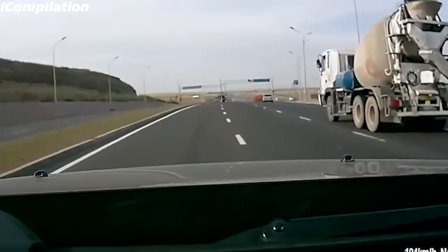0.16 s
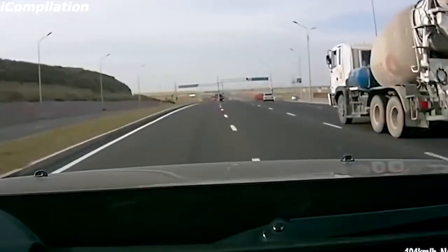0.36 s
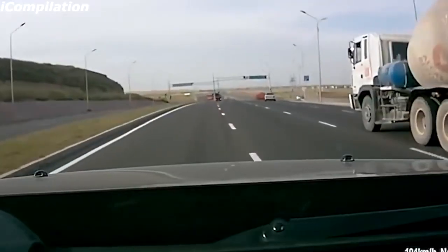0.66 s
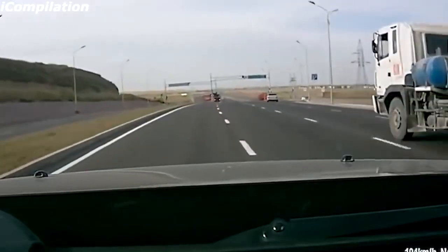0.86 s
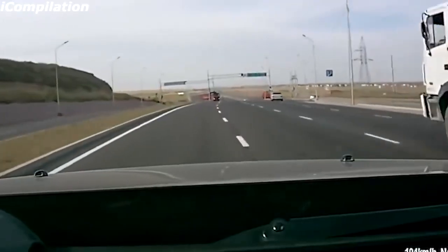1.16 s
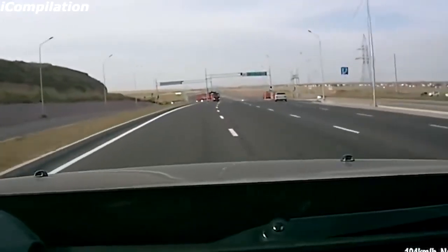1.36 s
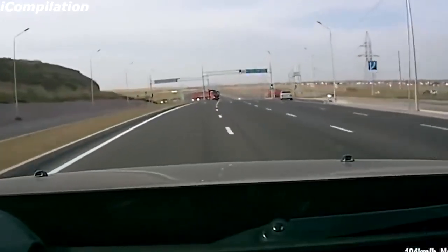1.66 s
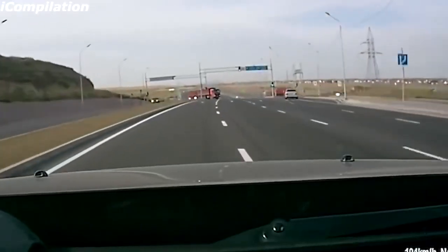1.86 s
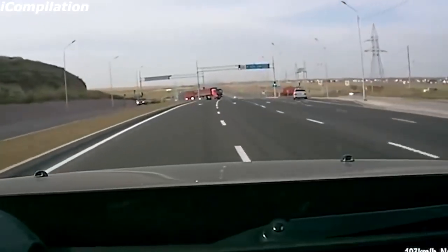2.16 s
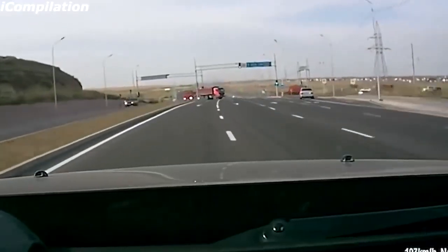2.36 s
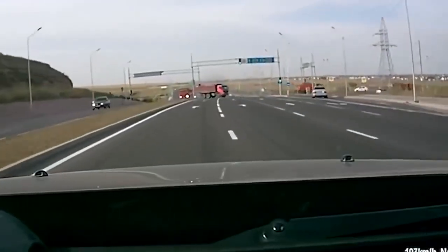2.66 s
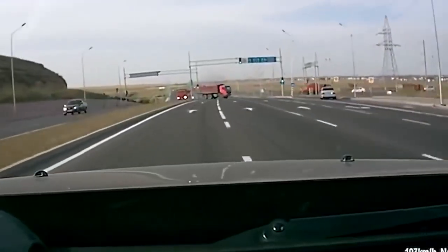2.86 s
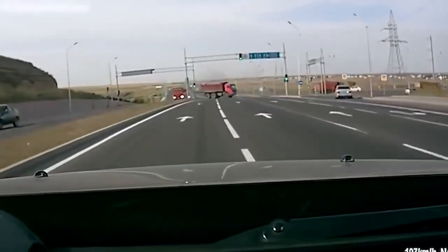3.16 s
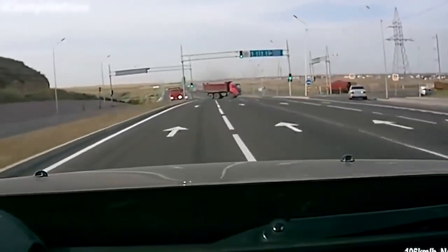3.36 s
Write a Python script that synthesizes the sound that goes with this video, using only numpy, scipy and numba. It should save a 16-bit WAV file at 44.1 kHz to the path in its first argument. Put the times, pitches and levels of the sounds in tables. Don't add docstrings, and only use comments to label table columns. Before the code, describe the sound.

Heavy low road rumble and fluttering air pressure inside a fast car, overloading a cheap microphone

```python
import sys
import numpy as np
from scipy import signal
from scipy.io import wavfile
from scipy.ndimage import uniform_filter1d
from numba import njit

SR = 44100
rng = np.random.default_rng(int(sys.argv[2]) if len(sys.argv) > 2 else 0)


def volts(x):
    e = np.asarray(x, float) / 20
    return 10 ** e


def wrap_up_sound(samples):
    columns = np.atleast_2d(samples).T
    tamed = np.clip(columns, -1, 1)
    steps = np.round(tamed * 32767).astype(np.int16)
    wavfile.write(sys.argv[1], SR, steps)


N = 154350
T = np.arange(N) / SR

# (time [s], rate [Hz], level [dB])
THROB = [(0.0, 12.66, -33), (0.201, 14.76, -31), (0.42, 17.19, -24.5), (0.6, 15.64, -25),
         (0.72, 15.88, -29), (0.849, 15.08, -22), (1.05, 13.74, -22), (1.301, 15.9, -23),
         (1.497, 17.02, -22), (1.598, 11.64, -30), (1.718, 14.52, -22.5), (1.95, 13.83, -26),
         (2.148, 15.37, -27), (2.454, 14.91, -25.5), (2.8, 16.63, -19), (3.1, 14.38, -17),
         (3.349, 16.77, -24.5), (3.5, 14.8, -66)]
# (time [s], length [s], direction [+1 or -1])
SURGES = [(.840, .0035, 1), (.940, .0078, -1), (1.049, .004, 1), (1.083, .005, -1), (1.343, .0065, -1),
          (1.3725, .004, 1), (1.418, .002, -1), (1.692, .0055, -1), (1.719, .0075, 1), (1.822, .0045, -1),
          (2.9365, .0095, -1), (3.067, .0078, -1)]
# (time [s], peak level [dB])
SPITS = [(0.272, -62), (0.8323, -39), (0.9696, -44), (0.998, -55), (1.0187, -49), (1.04, -50),
         (1.0746, -44), (1.304, -49), (1.36, -34), (1.402, -47), (1.4637, -48), (1.512, -46), (1.6842, -44),
         (1.711, -49), (1.743, -49), (1.778, -60), (1.8095, -44.5), (1.836, -39), (2.6166, -49),
         (2.678, -51), (2.749, -43), (2.9276, -40), (2.9583, -38), (3.0012, -50), (3.193, -48), (3.26, -42)]


def rms_one(x):
    return x / np.sqrt(np.mean(x ** 2) + 1e-20)


def drift(rate):
    hop = 40
    r = np.exp(-2 * np.pi * rate * hop / SR)
    white = rng.standard_normal(N // hop + 2002)
    slow = signal.lfilter([1], [1, -2 * r, r * r], white)[2000:]
    return np.interp(np.arange(N) / hop, np.arange(len(slow)), rms_one(slow))


def bandpass(x, low, high, order=2):
    return signal.sosfilt(signal.butter(order, [low, high], "band", fs=SR, output="sos"), x)


def banded_noise(spectrum, patchy_db, rate):
    hz, db = np.transpose(spectrum)
    together = drift(rate)
    edges = 14 * 2 ** np.arange(0, 10.6, .5)
    edges = edges[(edges > hz[0] / 1.5) & (edges < hz[-1] * 1.5)]
    white = rng.standard_normal((2, N + SR // 2))
    out = 0
    for k, (low, high) in enumerate(zip(edges, edges[1:])):
        band = bandpass(white[k % 2], low, high)[-N:]
        band_db = np.interp(np.log(low * high) / 2, np.log(hz), db)
        flicker_db = patchy_db * (1.1 * together + drift(rate))
        out = out + band * volts(band_db + flicker_db)
    return rms_one(out)


def resonances(modes, patchy_db, rate):
    out = 0
    for hz, width, db in modes:
        r = np.exp(-np.pi * width / SR)
        sos = [[1, 0.0011, -1, 1, -2 * r * np.cos(2 * np.pi * hz / SR), r * r]] * 2
        ring = rms_one(signal.sosfilt(sos, rng.standard_normal(N + SR))[-N:])
        out = out + volts(db + patchy_db * drift(rate)) * ring
    return out


def swing_phase():
    s, hz, _ = np.transpose(THROB)
    return 2 * np.pi * np.cumsum(np.interp(T, s, hz)) / SR


def throb():
    wobble_db, overtone_db, squaring_db = .6, -16, -16.5
    s, _, db = np.transpose(THROB)
    phase = swing_phase()
    swing = np.cos(phase) + volts(overtone_db) * np.sin(3 * phase) - volts(squaring_db) * np.cos(3 * phase)
    return np.sqrt(2) * volts(np.interp(T, s, db) + wobble_db * drift(4.62)) * swing


def road(shake_db):
    # (frequency [Hz], density [dB per Hz])
    rumble_curve = [(15, -44.5), (25, -7.5), (151, -19), (286, -28.5), (345, -27), (489, -28.5), (800, -42),
                    (1040, -52), (1760, -120)]
    # (frequency [Hz], width [Hz], level [dB])
    boom_modes = [(33.33, 5.7, -41), (46.34, 20, -35), (76.85, 13.3, -40), (191.9, 46, -49.5),
                  (259.6, 96, -46.5), (498, 107, -56)]
    rumble_db, deep_hz, deep_share = -36, 86.2, .45
    rumble = volts(rumble_db) * banded_noise(rumble_curve, patchy_db=0.0, rate=3.76)
    body = rumble + resonances(boom_modes, patchy_db=0.0, rate=3.26)
    deep = signal.sosfiltfilt(signal.butter(2, deep_hz, fs=SR, output="sos"), body)
    return deep * volts(deep_share * shake_db) + (body - deep) * volts(shake_db)


def tyres(flutter_db):
    # (frequency [Hz], density [dB per Hz])
    roar_curve = [(880, -71), (1500, 7), (1600, 11.5), (2790, -3), (4000, 12), (5200, -28.5), (8800, -120)]
    # (frequency [Hz], width [Hz], level [dB])
    ring_modes = [(954, 277, -50.5), (1111.7, 103, -54), (1259, 158, -57), (2816, 260, -75.5)]
    roar_db, gust_db, cut_hz, puff_share = -56, 4, 3134, 0.76
    roar = volts(roar_db + gust_db * gust()) * banded_noise(roar_curve, patchy_db=0.88, rate=7.3)
    rings = resonances(ring_modes, patchy_db=1.34, rate=17)
    dulled = signal.sosfilt(signal.butter(8, cut_hz, fs=SR, output="sos"), roar + rings)
    return dulled * volts(puff_share * flutter_db)


def wind(flutter_db):
    # (frequency [Hz], density [dB per Hz])
    hiss_curve = [(2350, -42), (4000, 3), (5430, -18.5), (6650, -3.5), (9440, 0.5), (11800, -5),
                  (14000, -11.5)]
    # (frequency [Hz], width [Hz], level [dB])
    whistle_modes = [(5430, 2240, -73.5), (8200, 870, -89)]
    hiss_db, gust_db = -69.5, 6
    hiss = volts(hiss_db + gust_db * gust()) * banded_noise(hiss_curve, patchy_db=-1.5, rate=4.0)
    whistles = volts(gust_db * gust()) * resonances(whistle_modes, patchy_db=1.0, rate=32)
    return (hiss + whistles) * volts(flutter_db)


def seal_flutter():
    # (time [s], width [s], air level [dB], body level [dB])
    puff_events = [(0.242, 0.055, -5.5, -5.5), (0.363, 0.022, 7.5, 4), (.48, 0.029, -7, -5.5),
                   (.56, 0.095, 2.5, 2), (0.691, 0.02, 9.5, 5.5), (.76, 0.053, 4.5, 2.5),
                   (.826, 0.0088, 2.5, 4.5), (1.077, 0.0058, 2.5, 5.5), (1.17, 0.17, 3, 2),
                   (1.41, 0.0054, 10, 11), (1.471, 0.011, 7, 5.5), (1.525, 0.028, 7, 7),
                   (1.594, 0.035, 11.5, 12), (1.633, 0.024, 5, 7), (1.813, 0.0054, 4.5, 9),
                   (1.918, 0.0061, 9.5, 3.5), (2.06, 0.011, 7, 7), (2.11, 0.06, 9.5, 6.5),
                   (2.291, 0.026, 4.5, 5), (2.468, 0.034, 5.5, 4), (2.62, 0.018, 4.5, 1),
                   (2.748, 0.0085, 1.5, -0.5), (2.828, 0.04, 8.5, 6), (2.91, 0.013, -3, 1),
                   (3.1, 0.17, 2.5, 1), (3.25, 0.032, 3.5, 3.5), (3.333, 0.011, 6, 0.5),
                   (3.45, 0.045, 5.5, 5)]
    breath_db, breath_lead = 2, .6
    spit_over_db, spit_share, spit_s = 52.5, 0.84, 0.0025
    air, body = 0, 0
    for s, width, air_db, body_db in puff_events:
        puff = np.exp(-((T - s) / width) ** 2)
        air = air + air_db * puff
        body = body + body_db * puff
    for s, db in SPITS:
        air = air + spit_share * (db + spit_over_db) * np.exp(-((T - s - spit_s) / spit_s) ** 2)
    breath = breath_db * np.cos(2 * swing_phase() + breath_lead) + 0.4 * drift(19)
    return air + breath, body + 0.94 * breath


def thumps():
    # (time [s], length [s], pitch [Hz], level [dB])
    joint_hits = [
        (.345, 0.024, 36.8, -23),
        (.645, 0.015, 45.6, -22.5),
        (1.55, 0.0344, 50.5, -20.5),
        (3.38, 0.016, 49, -21.5),
    ]
    out = 0
    for s, length, hz, db in joint_hits:
        out = out + volts(db) * np.exp(-((T - s) / length) ** 2) * np.sin(2 * np.pi * hz * (T - s))
    return out


def surges():
    out = 0
    for s, length, way in SURGES:
        out = out + way * volts(-8) * np.exp(-(2 * (T - s) / length) ** 4)
    return out


def gust():
    peak_s, rise_s, fall_s = 2.5, 0.8, 0.24
    return np.exp(-((T - peak_s) / np.where(T < peak_s, rise_s, fall_s)) ** 2)


@njit
def gain_control(x, trim, limit, top, most, down, up, hold):
    out, gain, wait = np.empty_like(x), most, 0.
    for i in range(len(x)):
        out[i] = min(max(x[i] * gain * trim[i], -top), top)
        if abs(x[i]) * gain > 1.3 * top:
            wait = hold
        elif abs(x[i]) * gain > limit:
            gain, wait = gain * down, hold
        elif wait > 0:
            wait -= 1
        else:
            gain = min(gain * up, most)
    return out


def patchwork(shape, lines, frames):
    smooth = uniform_filter1d(rng.standard_normal(shape), size=lines, axis=0)
    return rms_one(uniform_filter1d(smooth, size=frames, axis=1))


def spectral_thinning(x):
    # (frequency [Hz], level against the local mean [dB])
    drop_curve = [(1000, -30), (3000, -10), (4200, -2.5), (6000, -7), (9500, -5), (11000, -1), (13000, 2)]
    leak_db, drop_wander_db, sudden_s = -19, 3, .008
    edge_hz, edge_gust_hz, edge_sudden_hz, edge_wander_hz = 12600, 400, 13500, 800

    hz, s, z = signal.stft(x, SR, nperseg=2048, noverlap=1536)
    event_s = [row[0] for row in [*SURGES, *SPITS]]
    sudden = np.abs(s[:, None] - event_s).min(axis=1) < sudden_s
    swell = gust()[np.minimum((s * SR).astype(int), N - 1)]

    at, under_db = np.transpose(drop_curve)
    height = uniform_filter1d(np.abs(z), size=3, axis=1)
    mean = uniform_filter1d(height, size=32, axis=0)
    limit_db = np.interp(hz, at, under_db)[:, None] + drop_wander_db * patchwork(z.shape, 16, 6)
    weak = height < mean * volts(limit_db)
    kept = signal.istft(z * np.where(weak, volts(leak_db), 1), SR, noverlap=1536)[1][:N]
    calm = uniform_filter1d(np.interp(T, s, 1. - sudden) ** 2, size=200)
    mixed = calm * kept + (1 - calm) * x

    edge = np.where(sudden, edge_sudden_hz, edge_hz + edge_gust_hz * swell)
    ragged = edge_wander_hz * (1 - .6 * swell) * patchwork(z.shape, 5, 5)
    hz, s, z = signal.stft(mixed, SR, nperseg=2048, noverlap=1536)
    above = hz[:, None] > edge + ragged
    return signal.istft(z * np.where(above, volts(leak_db), 1), SR, noverlap=1536)[1][:N]


def scene():
    air_db, body_db = seal_flutter()
    pressure = throb() + surges() + thumps()
    return (pressure + road(body_db) + tyres(air_db) + wind(air_db))[None]


def low_pass(x):
    return signal.sosfilt(signal.butter(12, 15780, fs=SR, output="sos"), x)


def record(dry):
    ceiling, limit_db, most_gain_db = .232, -14.0, 7.5
    attack_db_per_s, release_db_per_s, hold_s = 753, 95, 0.0094
    wake_db, wake_s = -9, .24
    self_noise_db, shelf_db = -66.5, -90

    trim = volts(wake_db * np.clip(1 - T / wake_s, 0, 1))
    down = float(volts(-attack_db_per_s / SR))
    up = float(volts(release_db_per_s / SR))
    flat = gain_control(dry[0], trim, float(volts(limit_db)), ceiling, float(volts(most_gain_db)),
                        down, up, hold_s * SR)
    self_noise = volts(self_noise_db) * rms_one(bandpass(rng.standard_normal(N), 3000, 11000))
    flat = np.where(np.abs(flat) < ceiling, flat + self_noise, flat)
    shelf = rms_one(bandpass(rng.standard_normal(N), 11500, 17000, order=4))
    swell_db = 8 * gust() + 2 * drift(8)
    mix = spectral_thinning(flat) + volts(shelf_db + swell_db) * shelf
    return low_pass(mix[None])


dry = scene()
out = record(dry)
wrap_up_sound(out)
```